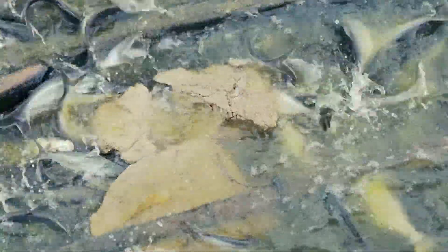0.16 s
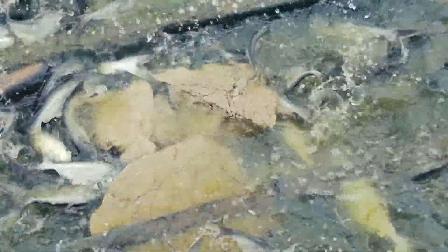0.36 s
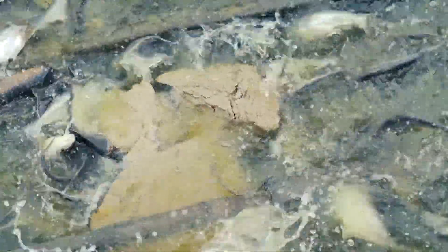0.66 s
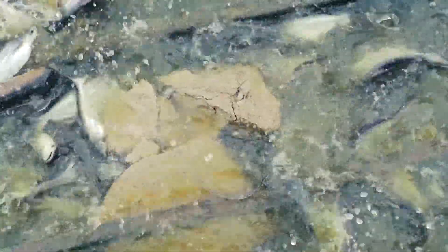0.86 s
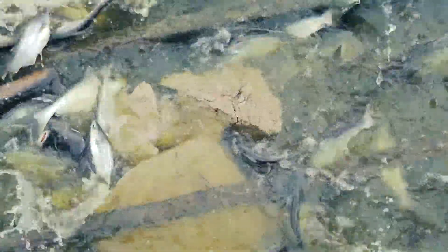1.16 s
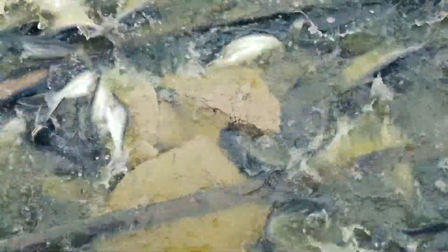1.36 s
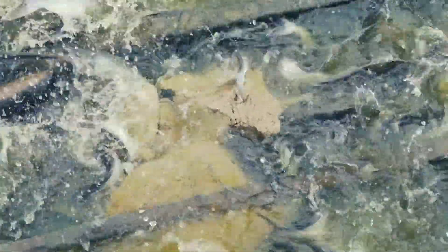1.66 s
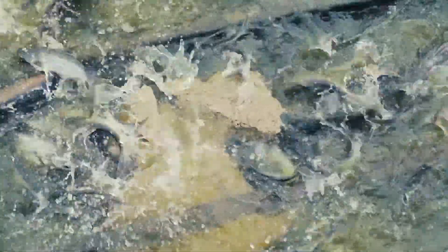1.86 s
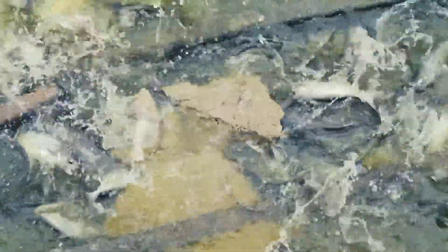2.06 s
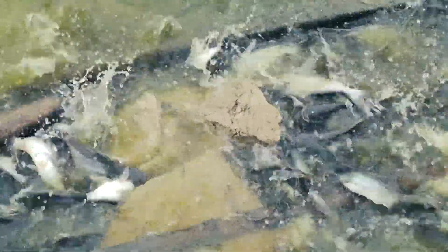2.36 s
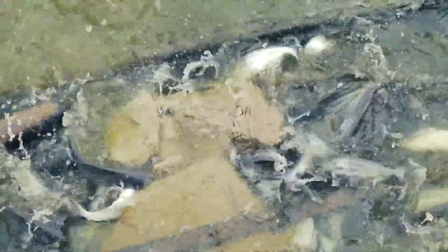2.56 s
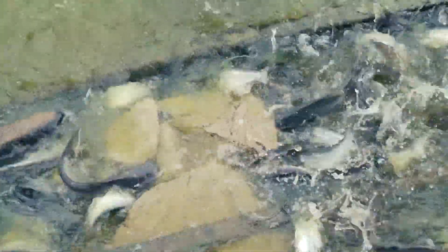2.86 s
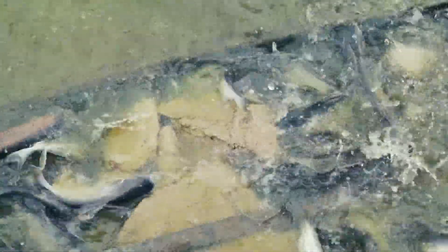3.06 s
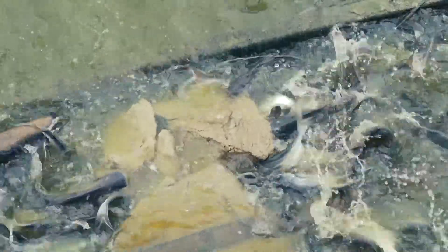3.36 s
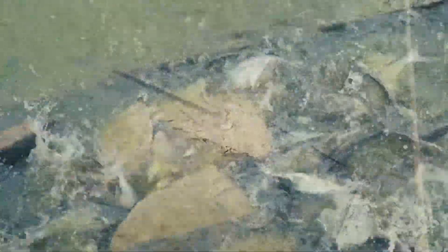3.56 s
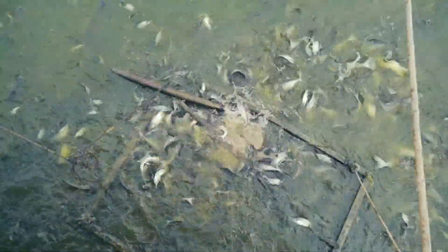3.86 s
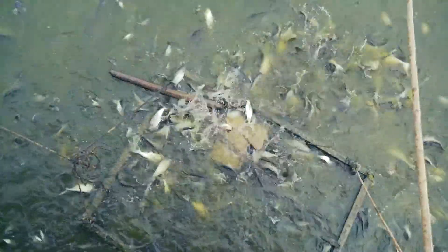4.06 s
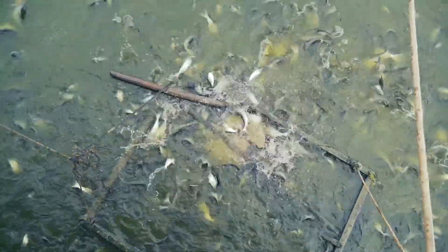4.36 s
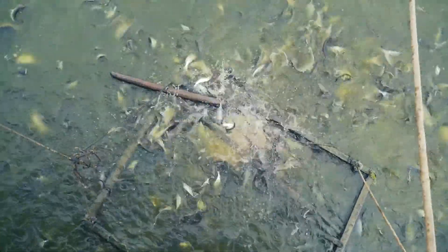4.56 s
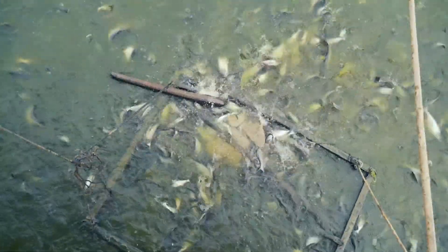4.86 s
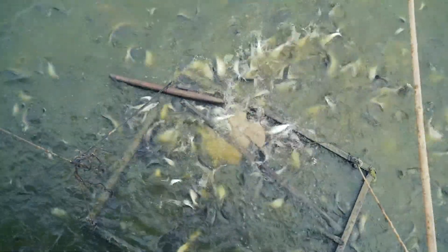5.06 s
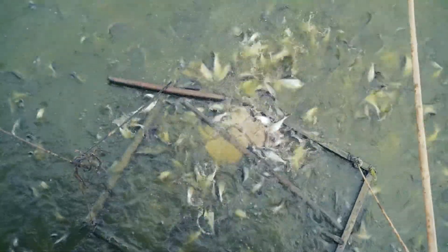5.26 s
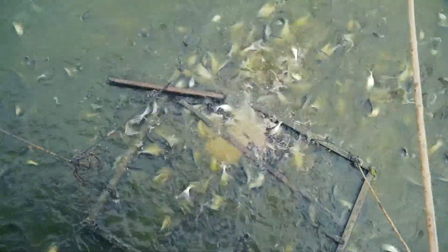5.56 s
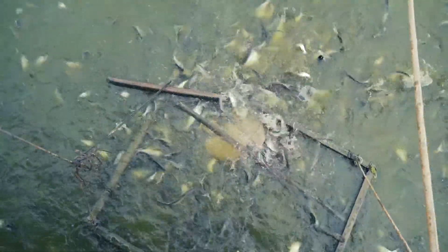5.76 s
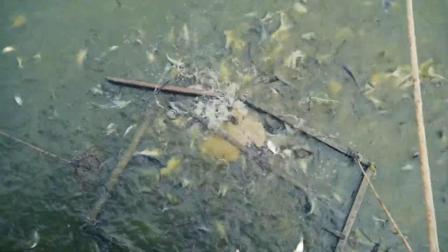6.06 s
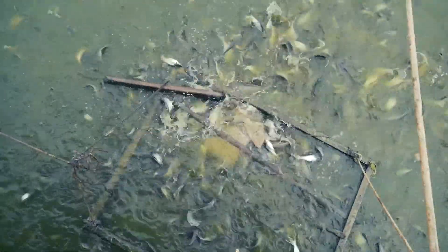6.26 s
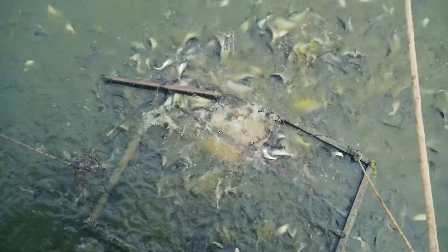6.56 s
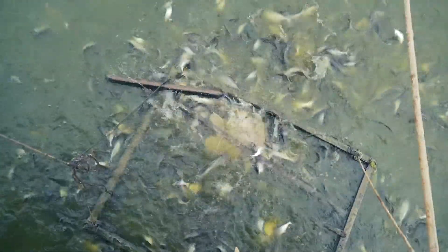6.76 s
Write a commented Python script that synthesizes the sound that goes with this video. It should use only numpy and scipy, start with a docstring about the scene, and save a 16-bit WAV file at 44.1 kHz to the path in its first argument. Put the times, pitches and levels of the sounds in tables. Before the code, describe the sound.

Continuous wet crackle of many fish splashing at the surface, close and bright, without echo. Bursts of spray, flat smacks and short rising bubble plops overlap at random. It gets fuller and deeper before two seconds, thins to a lighter fizz near three, then picks up again with more separate slaps. Very faint open air, a distant throbbing engine and tiny squeaks lie almost buried beneath.

```python
"""Churned water fizzes and bubbles from the start, as a crowd of fish feeds at a pond's surface.
The shoal thrashes a few metres below a two-port microphone: random impacts and ringing bubbles.
Tail flicks are noise bursts, slaps single pressure swings, plops large ringing pockets of air.
Far off, a slow engine throbs as filtered pulses beside a faint hum, murmuring air and high squeaks."""
import sys
import numpy as np
from scipy import signal
from scipy.fft import rfft, irfft
from scipy.io import wavfile

SR = 44100
rng = np.random.default_rng(int(sys.argv[2]) if len(sys.argv) > 2 else 0)


def wav_record(signal):
    """Record a signal, one row per channel, as 16-bit PCM in the file named by sys.argv[1]."""
    frames = np.transpose(np.atleast_2d(signal))
    bounded = np.clip(frames, -1, 1)
    # unit amplitude maps onto the largest positive 16-bit level
    quanta = np.round(bounded * 32767).astype(np.int16)
    wavfile.write(sys.argv[1], SR, quanta)


N = 305172
TIME = np.arange(N) / SR  # s


def gain_of(db):
    """Decibels to amplitude."""
    return 10 ** (np.asarray(db) / 20)


def evened(x):
    """Scales to an rms of 1."""
    return x / np.sqrt(np.mean(x ** 2) + 1e-20)


def read(points, hz):
    """Reads a spectrum table on a log-frequency axis."""
    f, value = np.transpose(points)
    return np.interp(np.log(hz + 1), np.log(f + 1), value)


def curves(rows):
    """One value a sample for each column of a time table."""
    s, *columns = np.transpose(rows)
    return [np.interp(TIME, s, c) for c in columns]


def add(mix, s, sound):
    """Mixes a two-row sound in at time s."""
    part = mix[:, max(round(s * SR), 0):][:, :sound.shape[1]]
    part += sound[:, :part.shape[1]]


def colour(x, points, size=2048):
    """Causal filter of unit energy with the given spectrum: clicks keep their sharp fronts."""
    hz = abs(np.fft.fftfreq(size, 1 / SR))
    log_gain = np.log(gain_of(read(points, hz)))
    minimum_phase = np.exp(np.conj(signal.hilbert(log_gain)))
    taps = np.fft.ifft(minimum_phase).real
    taps /= np.linalg.norm(taps)
    return signal.oaconvolve(x, taps[None], axes=1)[:, :x.shape[1]]


def above(x, hz):
    """The part of x above a gentle crossover."""
    return signal.sosfiltfilt(signal.butter(2, hz, "high", fs=SR, output="sos"), x)


def wander(corner_hz):
    """Smooth chance of rms 1, above 5 Hz and fading past corner_hz."""
    hz = np.fft.rfftfreq(N, 1 / SR)
    weight = (hz > 5) / (1 + (hz / corner_hz) ** 2)
    return evened(irfft(rfft(rng.standard_normal(N)) * weight, N))


def mid_and_side(sign, side):
    """Random polarity in the mid and random direction in the side, from chances of 0 to 1."""
    return np.array([np.sign(sign - .5), np.sqrt(12) * (side - .5)])


def drops(count, per_s, spread_db):
    """Random impacts of uneven size, each from its own direction (rows: mid, side)."""
    out = np.zeros((2, count))
    at = np.flatnonzero(rng.random(count) < per_s / SR)
    luck, sign, side = rng.random((len(at), 3)).T
    size = gain_of(spread_db * np.minimum(-np.log1p(-luck), 4))  # exponential chance in dB
    out[:, at] = size * mid_and_side(sign, side)
    return evened(out)


def surges(per_s, life_s, spread_db):
    """Envelope of rms 1 from many small splashes, each starting at once and dying away."""
    size = gain_of(spread_db * np.minimum(rng.exponential(1, N), 2.5))
    power = size ** 2 * (rng.random(N) < per_s / SR)
    keep = np.exp(-2 / (life_s * SR))
    power = signal.lfilter([1], [1, -keep], power)
    return evened(np.sqrt(power + 0.81 * power.mean()))


def bubble(hz, life, rise, onset=0.14):
    """A pocket of air rings and dies; its pitch climbs as it nears the surface."""
    age = np.arange(int(5 * life * SR)) / (life * SR)  # in lives
    pitch = hz * 2 ** (rise * np.minimum(age, 3))
    turns = np.cumsum(pitch) / SR
    return np.sin(2 * np.pi * turns) * (1 - np.exp(-age / onset)) * np.exp(-age)


POCKET_HZ = 1000  # reference pitch at which a pocket's life is given
# small bubbles close by, before a tilt towards the low ones: f/Hz, relative level/dB
BUBBLE_SIZES = [(350, -16.5), (550, -13), (900, -4), (1130, -4), (1600, 1.5), (2800, 1), (4000, -3.5),
                (7000, -3), (13000, -13.5)]


def small_bubbles(life_s, spread_db, cloud_db, life_spread=1.46, rise_octaves=0.125, count=12000):
    """Bubble clouds come and go by octave; high bubbles die sooner and are commoner per octave."""
    out = np.zeros((2, N))
    clouds = [wander(corner_hz=48) for octave in range(6)]
    when, small, long, rise, big, sign, side = rng.random((count, 7)).T
    lowest, highest = 350 ** .6, 13000 ** .6
    hz = (lowest + small * (highest - lowest)) ** (1 / .6)
    life = life_s * 2 ** (life_spread * (long - .5)) * (POCKET_HZ / hz) ** .5
    db = read(BUBBLE_SIZES, hz) - 6 * np.log10(hz)
    db += spread_db * np.minimum(-np.log1p(-big), 3)
    octave = np.log2(hz / 350).astype(int)
    direction = mid_and_side(sign, side)
    for k in range(count):
        ring = bubble(hz[k], life[k], rise_octaves * rise[k], onset=0.075)
        cloud = clouds[octave[k]][int(when[k] * N)]
        size = gain_of(db[k] + cloud_db * cloud) / np.linalg.norm(ring)
        add(out, when[k] * N / SR, size * np.outer(direction[:, k], ring))
    return evened(above(out, hz=220))


# brief dips in the splashing: middle t/s, half length/s, level/dB
LULL_DIPS = [(0.08, 0.046, -2.5), (0.13, 0.016, -2.5), (3.12, 0.018, -4.5), (3.3, 0.029, -3.5),
             (3.693, 0.022, -3), (4.96, 0.02, -2), (5.1, 0.023, -4), (5.335, 0.052, -7), (5.58, 0.041, -2),
             (5.71, 0.012, 0), (6.359, 0.02, -5.5)]


def lulls():
    """Level in dB of the brief dips in the splashing, each a smooth bell in time."""
    return sum(db * np.exp(-((TIME - s) / half) ** 2) for s, half, db in LULL_DIPS)


# how hard the whole shoal thrashes: t/s, relative level/dB
THRASHING = [(0, -27.5), (0.2, -27.5), (0.32, -26.5), (0.6, -25.5), (0.9, -24.8), (1.27, -19), (1.65, -17),
             (2.12, -20), (2.62, -29), (3.3, -29), (3.77, -25.5), (4.08, -24.5), (4.6, -26), (4.95, -28),
             (5.2, -24), (5.65, -27), (6.15, -26.5), (6.92, -26.5)]
# splashing water near the microphone: f/Hz, relative level/dB per Hz
WATER_SPECTRUM = [(30, -65), (120, -53), (250, -27.5), (420, -20.5), (620, -11), (920, -4), (1130, -4.5),
                  (1650, -1.5), (2700, -2), (3700, -6.5), (6400, -7), (8500, -12), (10400, -16),
                  (16000, -18)]
# the finest spray: f/Hz, relative level/dB per Hz
FIZZ_SPECTRUM = [(200, -56), (2000, 7.5), (5000, 0), (7000, 0), (10400, -6), (13400, -5.5), (16000, -7.5)]
# the finest spray against the rest of the water: t/s, relative level/dB
FIZZ_LEVEL = [(0, 7), (1.3, -3.5), (2.1, 3), (3.2, -0.5), (3.7, 0.5), (4.5, 8.5), (5.9, -8.5), (6.45, 9),
              (6.92, -9)]
# above a calm level, each dB of thrashing lifts the low bubbles and drowns some of the fine spray
CALM_DB, DEEPEN_DB_PER_DB, DULL_DB_PER_DB = -25.5, 0.37, 0.27


def shoal(level_db=-2.5, wash_db=-8, patter_db=-4.0, bubbles_db=-2.5, fizz_db=-10,
          merging=0.49, heave_db=0.5, flutter_db=0.96):
    """Fine wash, pattering drops, bubbles and fizzing spray follow the thrashing, which heaves at random."""
    thrash_db, = curves(THRASHING)
    excess_db = np.maximum(thrash_db - CALM_DB, 0)
    frenzy = gain_of(merging * excess_db)  # in a frenzy single sounds merge into a rush
    splashing = surges(per_s=220, life_s=0.02, spread_db=5.5)
    wash = gain_of(wash_db) * frenzy * drops(N, per_s=16000, spread_db=0.0)
    patter = gain_of(patter_db) * splashing * drops(N, per_s=3000, spread_db=3.5)
    bubbles = small_bubbles(life_s=0.00566, spread_db=3.0, cloud_db=2.5)
    bubbles *= gain_of(bubbles_db) / frenzy
    fizz = colour(drops(N, per_s=1900, spread_db=-1.5), FIZZ_SPECTRUM)
    fizz *= gain_of(fizz_db) * surges(per_s=60, life_s=0.0047, spread_db=6.0)
    water = colour(wash + patter, WATER_SPECTRUM) + bubbles
    water += gain_of(curves(FIZZ_LEVEL)[0]) * above(fizz, hz=400)
    low = water - above(water, hz=1170)
    high = above(water, hz=3280)
    depth_db = DEEPEN_DB_PER_DB * excess_db
    spray_db = flutter_db * wander(corner_hz=36) - DULL_DB_PER_DB * excess_db
    heave = heave_db / frenzy ** 2 * wander(corner_hz=6.4)
    swell = gain_of(level_db + thrash_db + lulls() + heave)
    return swell * (water + low * (gain_of(depth_db) - 1) + high * (gain_of(spray_db) - 1))


# the far engine's thuds: t/s, level/dB
ENGINE_LEVEL = [(0, -73), (3.5, -72.5), (4.62, -67), (4.79, -59.5), (5.05, -65), (5.35, -68), (6.05, -68),
                (6.42, -60.5), (6.75, -58), (6.92, -59)]
# the far engine speeds up and slows down: t/s, firing rate f/Hz
FIRING_RATE = [(0, 17.24), (3.5, 18), (4.55, 19.2), (4.8, 19.7), (5.05, 19.3), (5.35, 16.4), (6.05, 16.2),
               (6.45, 20.2), (6.65, 21.4), (6.92, 21.5)]
# blunt exhaust note: f/Hz, relative level/dB per Hz
EXHAUST_SPECTRUM = [(30, -31), (70, -27), (110, 1.5), (170, 0), (230, -1.5), (400, -23.5), (1000, -63)]
# faint hum that wanders: t/s, pitch f/Hz, level/dB
HUM_PATH = [(0, 261, -100), (3.9, 272, -71), (4.25, 266, -65), (4.55, 250.6, -68), (5.3, 265.3, -68.5),
            (5.8, 274, -63.5), (6.15, 273, -62), (6.35, 243, -75)]
# murmur of open air: f/Hz, relative level/dB per Hz
AIR_SPECTRUM = [(15, -14), (40, -8), (75, 10), (130, 7), (300, 15), (800, -33), (4000, -37)]


def distance(air_db=-63.5, smear=0.6):
    """One blunt exhaust thud per firing with a soft puff after it, a faint hum and low murmur of open air."""
    turns = np.cumsum(curves(FIRING_RATE)[0]) / SR
    thuds = evened(np.diff(np.floor(turns), prepend=0))
    puffs = 0.35 * evened(np.exp(-(turns % 1) / smear) * rng.standard_normal((2, N)))
    engine = colour(np.outer([1, 0], thuds) + puffs, EXHAUST_SPECTRUM)
    engine *= gain_of(curves(ENGINE_LEVEL)[0])
    hum_hz, hum_db = curves(HUM_PATH)
    hum = gain_of(hum_db) * evened(np.sin(2 * np.pi * np.cumsum(hum_hz) / SR))
    air = gain_of(air_db) * colour(rng.standard_normal((2, N)), AIR_SPECTRUM)
    return engine + np.outer([1, 0], hum) + air


# how often, typical length, level against the thrashing, extra spray, typical cloud pitch
LESSER_PER_S, LESSER_S, LESSER_DB, LESSER_SPRAY_DB, LESSER_HZ = 10, 0.0075, -7.5, 2, 2350


def lesser_flicks(spread_db=1.7, spray_spread_db=5, spread_octaves=0.59):
    """Small flicks at chance moments, their level following the thrashing (rows as in TAIL_FLICKS)."""
    slots = np.arange(0, N / SR, 1 / LESSER_PER_S)
    luck = rng.standard_normal((len(slots), 5)).T
    s = np.clip(slots + luck[0] / LESSER_PER_S / 2, 0, N / SR)
    db = np.interp(s, *np.transpose(THRASHING)) + LESSER_DB + spread_db * luck[1]
    length = LESSER_S * 2 ** (spread_octaves * luck[2])
    cloud_hz = LESSER_HZ * 2 ** (spread_octaves * luck[3])
    spray_db = LESSER_SPRAY_DB + spray_spread_db * luck[4]
    return list(zip(s, length, db, spray_db, cloud_hz))


# the biggest tail flicks, which throw spray:
# t/s, nominal length/s, level/dB, extra fine spray level/dB, bubble cloud f/Hz
TAIL_FLICKS = [(0.029, 0.015, -26.5, -9, 1500), (0.095, 0.017, -25, 3, 1960), (0.258, 0.02, -21, 5, 1580),
               (0.285, 0.017, -21, 6, 1700), (0.308, 0.022, -24.5, 7, 2800),
               (0.362, 0.023, -26.5, -11, 2400), (0.454, 0.0085, -23.5, -7, 6200),
               (0.471, 0.012, -21.5, 10, 1500), (0.612, 0.0091, -23, 2, 1640),
               (0.657, 0.018, -26, -1, 2700), (0.728, 0.0066, -22, 8, 3500), (0.905, 0.038, -25.5, 2, 2390),
               (0.936, 0.032, -26, 7, 2100), (1.108, 0.0056, -21.5, -18, 1590),
               (1.124, 0.012, -33, -2, 1620), (1.843, 0.0081, -23, 7, 2050), (1.995, 0.018, -20, 2, 1460),
               (2.138, 0.013, -20.5, 8, 1300), (2.156, 0.012, -22, 11, 2100), (2.231, 0.017, -24, 4, 5700),
               (2.283, 0.0082, -23, -1, 1400), (2.437, 0.02, -24.5, 7, 2200), (2.597, 0.011, -27, 4, 1210),
               (2.804, 0.0085, -29.5, 31, 7040), (2.844, 0.0061, -27.5, 29, 7240),
               (2.878, 0.008, -27, 14, 1600), (2.909, 0.0094, -27.5, 18, 1700),
               (3.034, 0.032, -22.5, 10.5, 3030), (3.151, 0.0098, -28, 10, 2500),
               (3.181, 0.012, -24.5, 5, 6500), (3.243, 0.012, -30.5, 24, 6450),
               (3.617, 0.029, -29, 5, 2120), (3.88, 0.016, -23, 1, 3040), (4.043, 0.012, -23.5, -11, 1800),
               (4.084, 0.013, -25.5, -1, 2310), (4.163, 0.008, -21.5, 0, 2930),
               (4.2, 0.006, -25, -11, 2330), (4.277, 0.01, -26, 6, 2800), (4.408, 0.011, -25.5, 19, 2100),
               (4.682, 0.012, -29, -18, 1230), (4.698, 0.008, -26.5, -20, 1780),
               (4.745, 0.014, -24, -3, 1193), (4.979, 0.01, -29, -13, 2200),
               (5.036, 0.0044, -22.5, -1, 1810), (5.06, 0.0095, -21, 6, 2600), (5.288, 0.014, -22, 0, 1750),
               (5.392, 0.014, -27.5, 10, 2800), (5.418, 0.022, -29, 8, 3020),
               (5.487, 0.0097, -25, -4, 1800), (5.52, 0.012, -23, 0, 2800), (5.623, 0.012, -24.5, 8, 2800),
               (5.866, 0.021, -27.5, 4, 900), (5.925, 0.006, -27, 7, 2480), (6.005, 0.02, -29.5, -16, 1500),
               (6.06, 0.006, -29, -9, 2180), (6.101, 0.038, -25, -2, 2200), (6.165, 0.031, -24.5, -4, 2800),
               (6.327, 0.0034, -19, 25, 2690), (6.406, 0.03, -31, 2, 2090), (6.548, 0.017, -23, -2, 2100),
               (6.609, 0.0085, -25, -16, 3040), (6.675, 0.02, -25, -5, 2750), (6.712, 0.012, -24, -6, 1800),
               (6.743, 0.032, -22.5, -2, 4530), (6.897, 0.008, -28, -10, 2170)]


def flicks(rise_s=0.0014, cloud_db=6, cloud_octaves=0.23, fallback_db=-17, fallback_s=0.12, count=7000):
    """Each flick tears water into drops and a ringing cloud of bubbles; a thin shower falls back."""
    out = np.zeros((2, N))
    t, hz = np.arange(count) / SR, np.geomspace(30, 16000, 80)
    treble = hz ** 4 / (hz ** 4 + 4500. ** 4)
    for s, length, db, spray_db, cloud_hz in list(TAIL_FLICKS) + lesser_flicks():
        cloud = np.exp(-(np.log2(hz / cloud_hz) / cloud_octaves) ** 2)
        spectrum_db = read(WATER_SPECTRUM, hz) + cloud_db * cloud + spray_db * treble
        spectrum = np.transpose([hz, spectrum_db])
        burst = evened(colour(drops(count, per_s=14000, spread_db=1.5), spectrum))
        tear = np.exp(-(t / (1.07 * length)) ** 4)
        shower = gain_of(fallback_db) * np.exp(-t / fallback_s)
        add(out, s, gain_of(db) * burst * (1 - np.exp(-t / rise_s)) * (tear + shower))
    return out


# the hardest smacks on the surface: t/s, level/dB, pitch f/Hz
SURFACE_SLAPS = [(0.1023, -9, 2680), (0.258, -11, 2840), (0.4283, -10, 4770), (0.461, -9, 5800),
                 (0.4907, -11, 6300), (1.1932, -6, 2450), (1.525, -5, 1870), (1.7653, -7, 4900),
                 (1.944, -10, 2570), (2.2964, -17, 5400), (3.0826, -12, 2470), (3.486, -10.5, 2520),
                 (3.887, -3.5, 4550), (4.1133, -9, 3570), (4.2443, -8, 3900), (4.2979, -9, 4100),
                 (4.397, -9.5, 3510), (4.5537, -8.5, 3270), (5.1319, -15, 2420), (5.489, -12, 2060),
                 (5.3028, -4, 1960), (5.421, -5.5, 3130), (5.5273, -11, 3480), (5.866, -8, 2520),
                 (5.877, -12, 2800), (5.9725, -12, 2230), (6.083, -10, 2790), (6.18, -6.5, 2460),
                 (6.3295, -7, 2900), (6.3776, -12, 4440), (6.5305, -7, 1980), (6.619, -9, 3370),
                 (6.637, -11, 2750), (6.7965, -8, 2030)]


def slaps(cycles=0.77, width=0.9, spatter_db=-8, spatter_s=0.0022, spread_octaves=0.362, count=10):
    """A body hits flat: one hard pressure swing, then a short spatter of bubbles around the same pitch."""
    out = np.zeros((2, N))
    t = np.arange(-88, 900) / SR  # the swing builds just before the hit
    for s, db, hz in SURFACE_SLAPS:
        turn, side = rng.uniform(-1, 1, 2)
        swing = np.cos(2 * np.pi * hz * t + np.pi * turn)
        smack = np.exp(-abs(t * hz / cycles) * 2) * swing
        pitches = hz * 2 ** (spread_octaves * rng.standard_normal((2, count, 1)))
        turns = pitches * t + rng.random((2, count, 1))
        spatter = evened(np.sin(2 * np.pi * turns).sum(1))
        spatter *= gain_of(spatter_db) * np.clip(t * hz / 2, 0, 1) * np.exp(-t / spatter_s)
        add(out, s + t[0], gain_of(db) * (np.outer([1, width * side], smack) + spatter))
    return above(out, hz=605)


# heavy bodies shoving the water aside: t/s, length/s, level/dB
BODY_SHOVES = [(0.255, 0.06, -58), (3.854, 0.073, -50)]
# their low thump: f/Hz, relative level/dB per Hz
THUMP_SPECTRUM = [(40, -25), (110, -6), (250, 0), (400, -1), (900, -25), (3000, -60)]


def shoves():
    """A heavy body displaces water, giving a soft, low swell of pressure."""
    out = np.zeros((2, N))
    push = evened(colour(np.outer([1, 0], rng.standard_normal(N)), THUMP_SPECTRUM))
    for s, length, db in BODY_SHOVES:
        swell = signal.windows.hann(round(length * SR))
        add(out, s, gain_of(db) * swell * push[:, round(s * SR):][:, :len(swell)])
    return out


# large air pockets closing at the surface: t/s, starting pitch f/Hz, level/dB
AIR_POCKETS = [(0.346, 1640, -13), (.62, 580, -28), (.714, 1200, -19), (.991, 400, -27.5),
               (1.628, 1020, -13.5), (1.971, 1325, -11), (2.194, 873, -15.5), (2.266, 1680, -12),
               (2.336, 1340, -16.5), (2.378, 1870, -14.5), (2.51, 1170, -21), (2.554, 2910, -15.5),
               (2.695, 376, -34.5), (2.945, 2360, -14.5), (3.083, 775, -20), (3.551, 1050, -21),
               (3.733, 2080, -15), (4.024, 2630, -11), (4.032, 620, -27), (4.046, 1520, -19),
               (4.068, 497, -31), (4.115, 378, -36), (4.14, 720, -23.5), (4.677, 940, -22),
               (5.01, 417, -27.5), (5.13, 2570, -12), (5.21, 652, -25), (5.26, 1060, -23.5),
               (5.303, 660, -28), (5.758, 1620, -14), (5.874, 885, -13.5), (5.972, 2280, -15),
               (5.983, 2700, -13), (6.019, 1740, -16.5), (6.082, 2740, -11), (6.217, 880, -16),
               (6.301, 1860, -18), (6.326, 2680, -14), (6.33, 440, -34.5), (6.388, 860, -20),
               (6.553, 2030, -17), (6.613, 1930, -12.5), (6.616, 3680, -9.5), (6.64, 468, -33),
               (6.709, 875, -23), (6.777, 533, -26), (6.816, 2170, -16)]
# life and climb per life at POCKET_HZ; larger, lower pockets ring longer and climb further
POCKET_LIFE_S, POCKET_RISE_OCTAVES, LIFE_POWER, RISE_POWER = 0.006, 0.062, 1.2, 1.41


def plops(width=0.52, wobble=0.21, spray_db=-15, spray_s=0.0024):
    """Gulping mouths and diving bodies close off large, wobbling air pockets, each with a spit of spray."""
    out = np.zeros((2, N))
    shape = 1 + wobble * wander(corner_hz=220)
    spray = evened(colour(drops(N, per_s=5500, spread_db=2), WATER_SPECTRUM))
    spray *= gain_of(spray_db)
    for (s, hz, db), side in zip(AIR_POCKETS, rng.uniform(-1, 1, len(AIR_POCKETS))):
        size = POCKET_HZ / hz
        life = POCKET_LIFE_S * size ** LIFE_POWER
        rise = POCKET_RISE_OCTAVES * size ** RISE_POWER
        ring = bubble(hz, life, rise, onset=0.13)
        at = (round(s * SR) + np.arange(len(ring))) % N
        spit = spray[:, at] * np.exp(-TIME[:len(ring)] / spray_s)
        add(out, s, gain_of(db) * (np.outer([1, width * side], ring * shape[at]) + spit))
    return out


# faint high squeaks from further off: t/s, length/s, pitch f/Hz, relative level/dB
FAR_SQUEAKS = [(3.945, 0.03, 2500, -31), (4.041, 0.024, 2450, -32.5), (4.06, 0.11, 2450, -37.5),
               (4.82, 0.073, 2460, -44), (5.15, 0.12, 2540, -40), (6.34, 0.099, 2470, -52)]
# their fundamental and overtones: multiple of the pitch, relative level/dB
SQUEAK_OVERTONES = [(1, -6), (2, -2), (3, 0)]


def squeaks(level_db=0.5, waver=.012, broken_db=4, width=.5):
    """Short, unsteady, broken whistles, strongest in their overtones."""
    out = np.zeros((2, N))
    unsteady = 1 + waver * wander(corner_hz=90)
    grip = gain_of(broken_db * wander(corner_hz=90))
    for s, length, hz, db in FAR_SQUEAKS:
        span = slice(round(s * SR), round((s + length) * SR))
        turns = np.cumsum(hz * unsteady[span]) / SR
        tones = [gain_of(tone_db) * np.sin(2 * np.pi * round(k) * turns) for k, tone_db in SQUEAK_OVERTONES]
        tone = evened(grip[span] * sum(tones))
        tone *= signal.windows.tukey(len(tone), .5)
        add(out, s, gain_of(db + level_db) * np.outer([1, -width], tone))
    return out


# likeness of the two microphone ports: f/Hz, left-right likeness (1 = alike)
PORT_LIKENESS = [(50, .999), (150, 0.9), (500, 0.9), (1200, 0.95), (2400, 0.68), (3400, 0.5), (6500, 0.5),
                 (9000, 0.18), (16000, 0.26)]
# balance of the ports: f/Hz, left minus right level/dB
PORT_BALANCE = [(300, 0), (1000, 1.5), (2300, 0), (3250, 3), (4600, 1), (7200, 0.5), (8600, 2.3),
                (10800, 1.5), (12400, 6), (16000, 2)]
# where the shoal lies, heard above the bass: t/s, left minus right level/dB
SHOAL_BEARING = [(0, -2), (1.8, -1), (2.3, -1.5), (2.8, -4), (3.5, -4), (3.8, -4), (5.7, -5.5), (6.92, -4)]
# left port's lead with the thrashing to one side: f/Hz, phase/rad (negative: right leads)
ASIDE_PHASE = [(50, -0.5), (780, 0.45), (1800, 0.39), (2900, 1.34), (3900, 0.5), (5200, 0.23), (7200, 1),
               (12000, 2.2), (16000, 0.5)]
# the same once the thrashing is ahead: f/Hz, phase/rad
AHEAD_PHASE = [(50, -0.14), (700, 0.5), (2500, 0.6), (2900, 0.2), (4100, -0.8), (7400, 0.7), (10000, 0),
               (13000, -0.7)]
TURN_S, TURN_LENGTH_S = 2.43, 0.26  # middle and length of the crossfade from aside to ahead


def ports(mid_side):
    """Two close microphone ports hear the bass alike and the treble each in its own way."""
    hz = np.fft.rfftfreq(N, 1 / SR)
    mid, side = rfft(mid_side)
    same = np.clip(read(PORT_LIKENESS, hz), 0, 1)
    side = side * np.sqrt((1 - same) / (1 + same))

    def heard(lead):
        """Left and right ports with half the balance and phase lead on each."""
        lean = gain_of(read(PORT_BALANCE, hz) / 2) * np.exp(.5j * read(lead, hz))
        return irfft(np.array([(mid + side) * lean, (mid - side) / lean]), N)

    aside, ahead = heard(ASIDE_PHASE), heard(AHEAD_PHASE)
    pair = aside + (ahead - aside) * np.clip((TIME - TURN_S) / TURN_LENGTH_S + .5, 0, 1)
    bearing_db, = curves(SHOAL_BEARING)
    return pair + above(pair, hz=600) * (gain_of(np.outer([.5, -.5], bearing_db)) - 1)


def scene():
    """All the water sounds over the distant background."""
    return ports(shoal() + distance() + flicks() + slaps() + shoves() + plops() + squeaks())


EDGE_HZ = 15800


def record(dry):
    """The recorder's band limit: a steep low-pass."""
    taps = signal.firwin(801, EDGE_HZ, window=("kaiser", 9), fs=SR)
    return signal.oaconvolve(dry, taps[None], "same")


dry = scene()
out = record(dry)
wav_record(out)
```